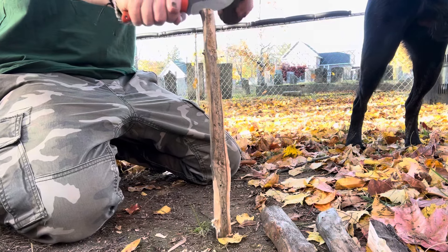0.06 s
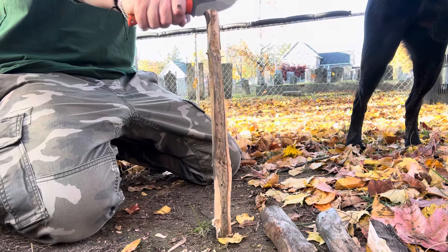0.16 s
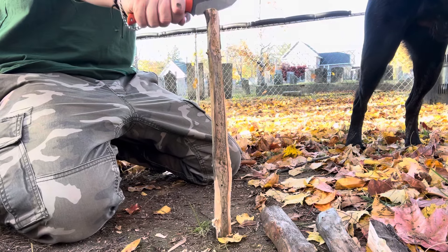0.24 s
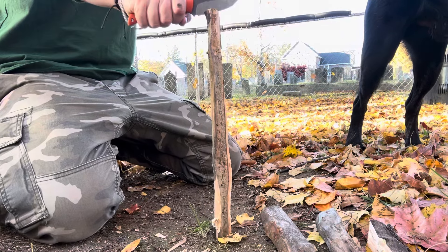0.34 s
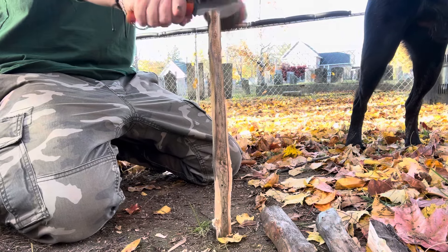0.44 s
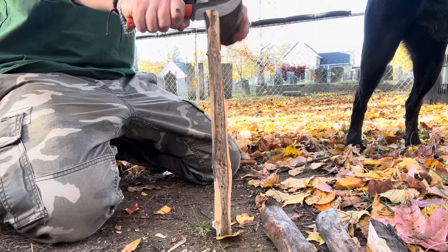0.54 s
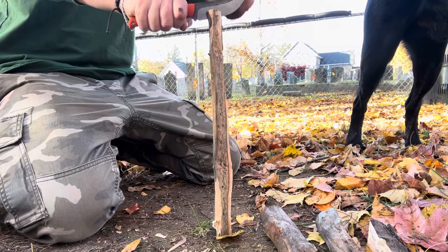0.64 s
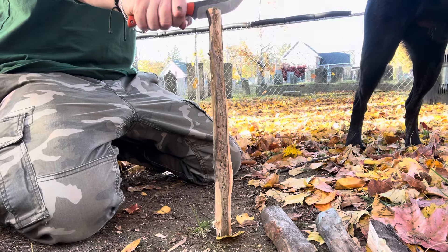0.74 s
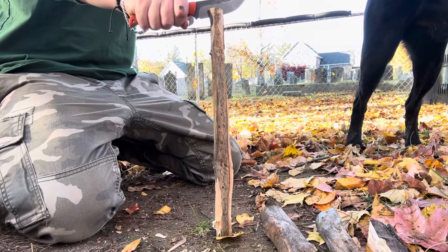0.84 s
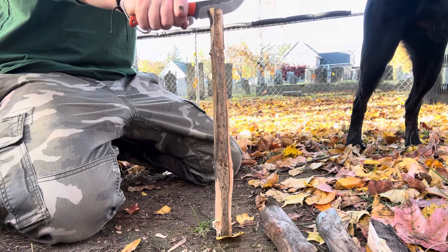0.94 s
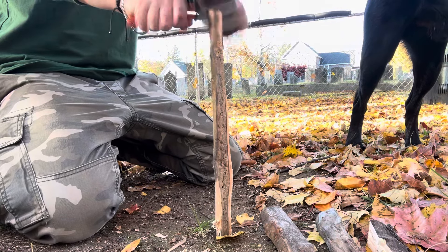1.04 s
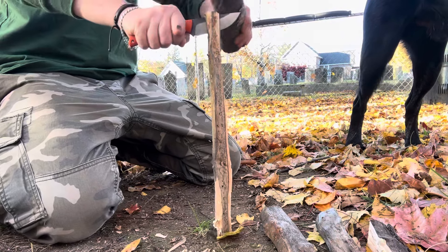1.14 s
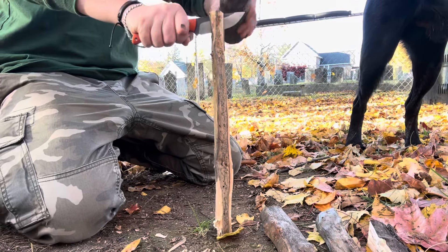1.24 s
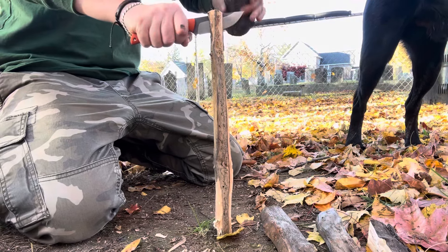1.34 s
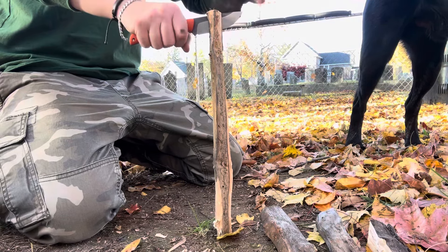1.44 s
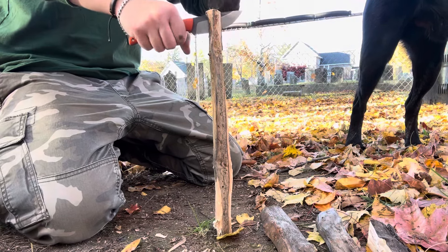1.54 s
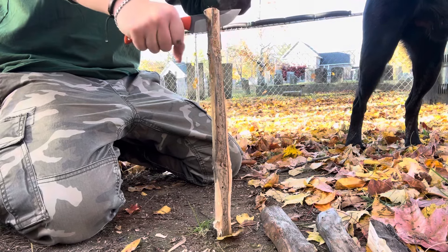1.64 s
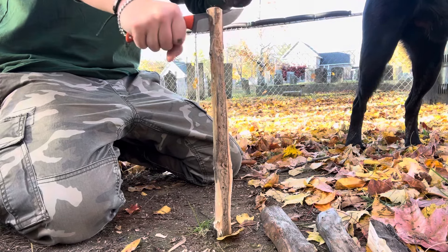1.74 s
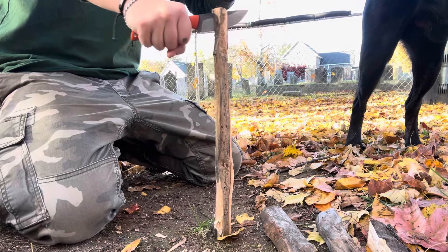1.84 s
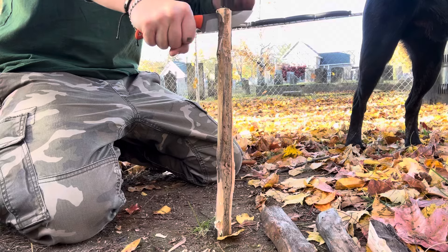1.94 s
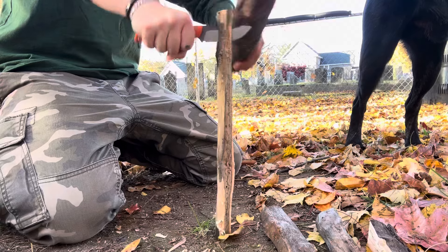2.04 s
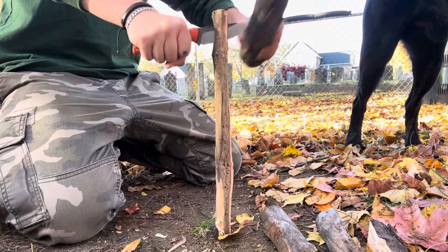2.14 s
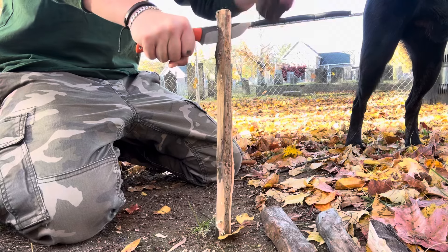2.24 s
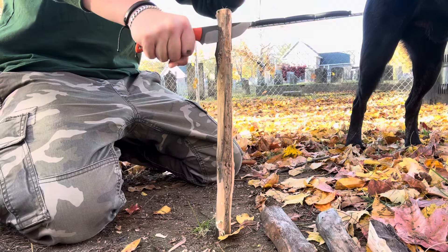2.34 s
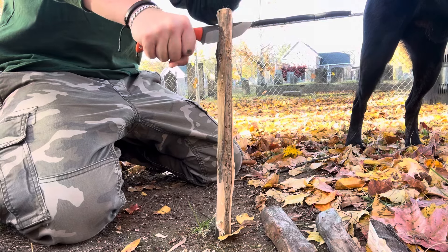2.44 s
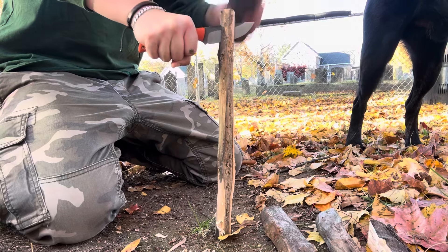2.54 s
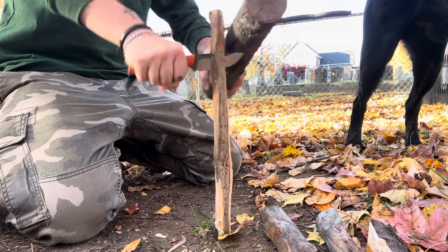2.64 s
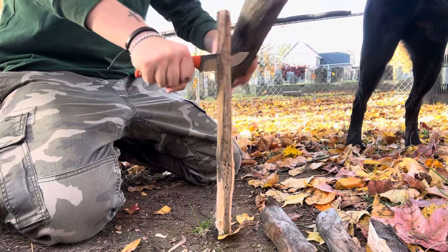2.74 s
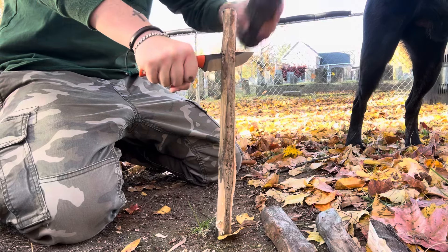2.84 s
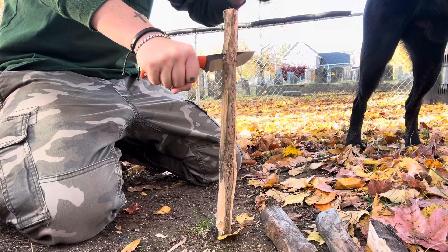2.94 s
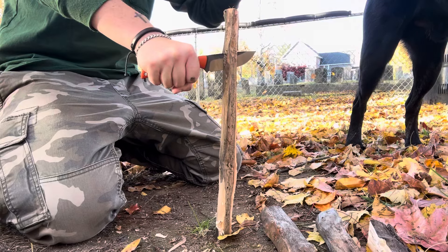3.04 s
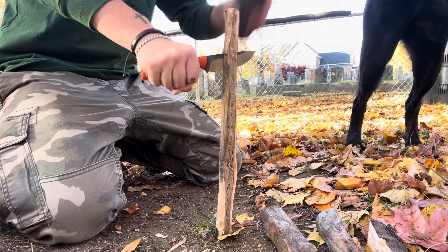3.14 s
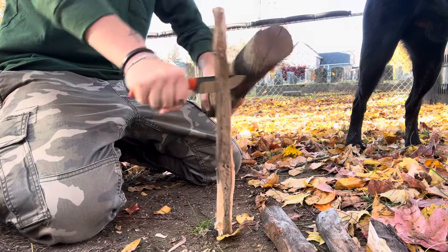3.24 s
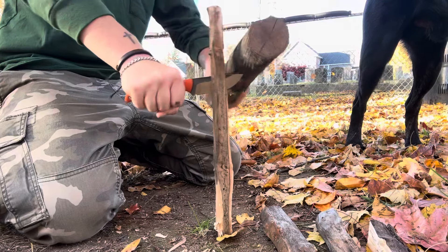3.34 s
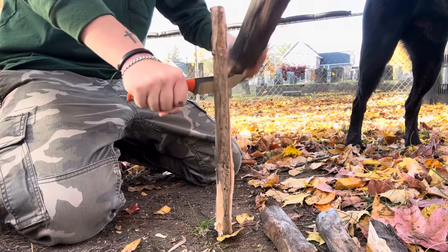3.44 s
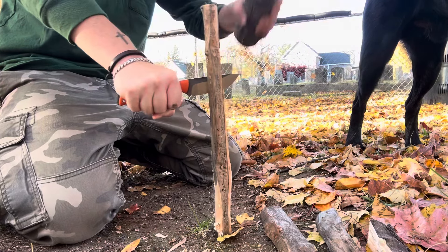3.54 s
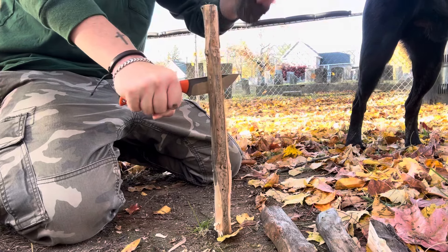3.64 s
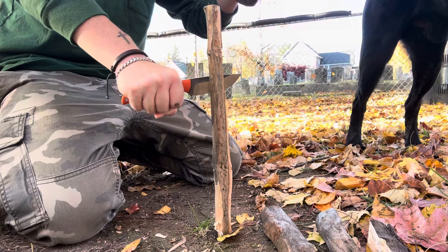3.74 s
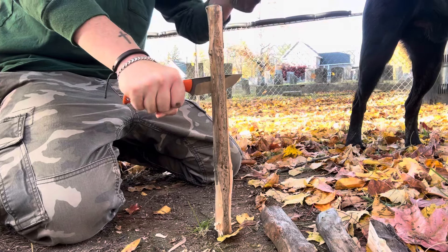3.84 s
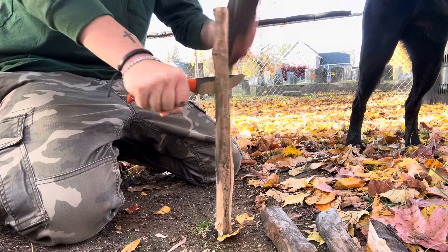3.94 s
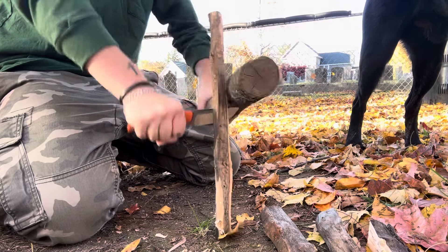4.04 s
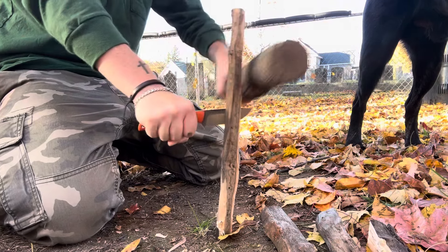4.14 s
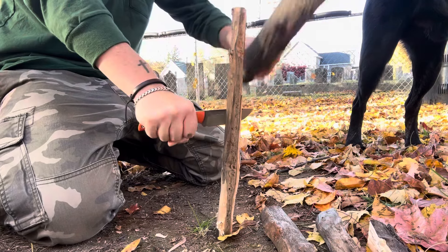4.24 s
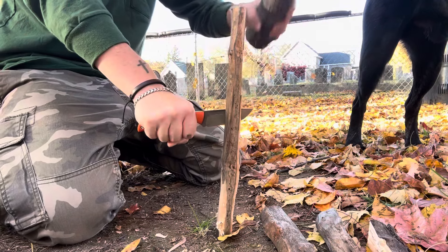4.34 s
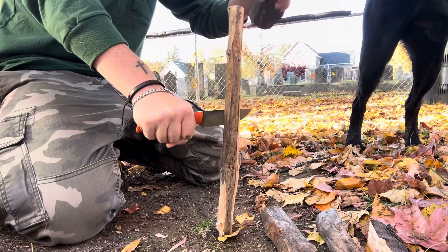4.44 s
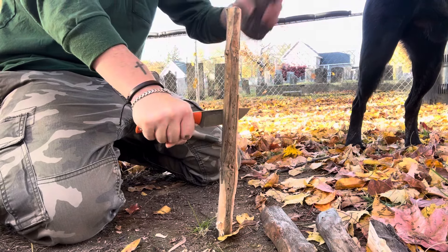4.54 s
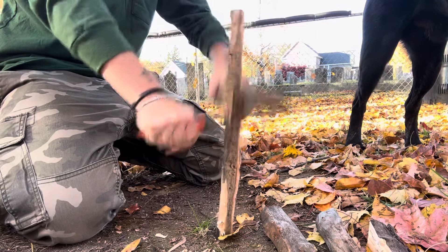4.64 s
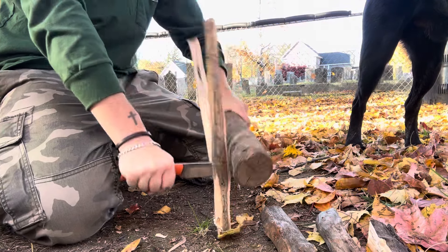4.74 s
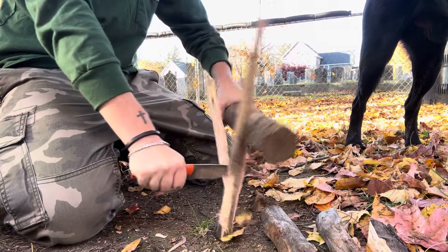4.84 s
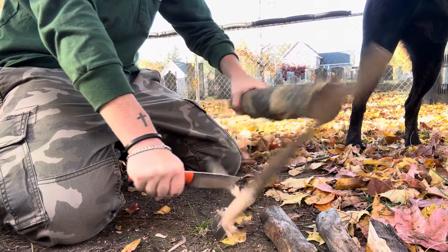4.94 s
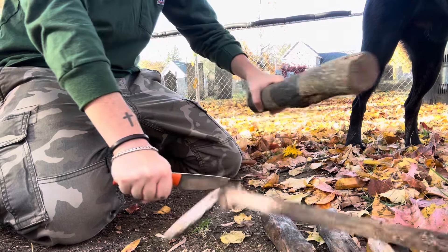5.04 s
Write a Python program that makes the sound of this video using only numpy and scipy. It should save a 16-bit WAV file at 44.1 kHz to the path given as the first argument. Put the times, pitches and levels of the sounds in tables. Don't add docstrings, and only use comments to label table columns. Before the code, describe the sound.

A short log knocks a knife down through a stick in seven sharp woody blows outdoors, until the wood splits and clatters onto soil.

```python
import sys
import numpy as np
from scipy import signal
from scipy.fft import rfft, irfft, next_fast_len
from scipy.io import wavfile
from scipy.ndimage import uniform_filter1d, map_coordinates

SR = 44100
rng = np.random.default_rng(int(sys.argv[2]) if len(sys.argv) > 2 else 0)


def attenuation_scalar(level_db):
    decades = np.asarray(level_db, float) / 20
    return 10 ** decades


def waveform_to_disk(signal):
    frames = np.transpose(np.atleast_2d(signal))
    scaled = np.clip(frames, -1, 1) * 32767
    samples = np.round(scaled).astype(np.int16)
    wavfile.write(sys.argv[1], SR, samples)


N = 224369


def along(points, hz):
    f, v = np.transpose(points)
    return np.interp(np.log(hz + 1), np.log(f + 1), v)


def unit(x):
    return x / np.sqrt(np.mean(x ** 2) + 1e-20)


def curves(rows):
    s, *cols = np.transpose(rows)
    return [np.interp(np.arange(N) / SR, s, c) for c in cols]


def add(track, s, sound):
    part = track[..., round(s * SR):][..., :sound.shape[-1]]
    part += sound[..., :part.shape[-1]]


def ring(hz, t60, rise_s):
    t = np.arange(SR // 5) / SR
    return np.sin(2 * np.pi * hz * t) * attenuation_scalar(-60 * t / t60) * (1 - np.exp(-t / rise_s))


def coloured(x, gain):
    n = x.shape[-1]
    return irfft(rfft(x) * gain(np.fft.rfftfreq(n, 1 / SR)), n)


def rush(spectrum, patchy_db):
    # frequency in Hz, likeness of left and right from -1 to 1.
    likeness = [(60, 0.98), (130, 0.81), (290, 0.16), (640, -0.059), (1400, -0.6), (3100, 0.02),
                (15000, 0.83)]
    z = signal.stft(rng.standard_normal((2, N + 1023)), nperseg=512)[2]
    field = uniform_filter1d(rng.standard_normal(z.shape[1:]), 6, 0)
    field = uniform_filter1d(field, 14, 1)
    pair = signal.istft(z * attenuation_scalar(patchy_db * unit(field)), nperseg=512)[1][:, :next_fast_len(N)]

    def gain(hz):
        turn = np.arccos(np.clip(along(likeness, hz), -1, 1)) / 2
        return attenuation_scalar(along(spectrum, hz)) * [np.cos(turn), np.sin(turn)]

    mid, side = coloured(pair, gain)[:, :N]
    return unit(np.array([mid + side, mid - side]))


def traffic():
    # time in seconds, rumble level in dB.
    passing = [(0, -37.5), (.4, -40), (1.0, -40), (1.7, -40), (2.3, -43.5), (2.9, -43.5), (3.3, -42.5),
               (3.7, -44.5), (4.0, -40), (4.3, -46), (5.09, -42.5)]
    # frequency in Hz, density in dB per Hz.
    rumble = [(13, -68), (22, -31.5), (43, -10), (86, -5), (134, -14), (156, -13), (266, -25.5),
              (300, -25.5), (390, -62.5), (660, -120)]
    road = [(110, -37), (180, -4.5), (267, -8), (333, -9.5), (450, -12), (500, -11.5), (1800, -19.5),
            (2340, -59), (3960, -120)]
    air = [(700, -41.5), (1200, -41), (1900, 6.5), (2500, 3), (4300, -2), (6250, -7.5), (10000, -12),
           (12000, -21.5), (12900, -59)]
    traffic_db, = curves(passing)
    swing_db = traffic_db - traffic_db.mean()
    out = attenuation_scalar(traffic_db) * rush(rumble, patchy_db=1.0)
    out += attenuation_scalar(-54.0 + 0.94 * swing_db) * rush(road, patchy_db=0.44)
    out += attenuation_scalar(-61.5 + 0.25 * swing_db) * rush(air, patchy_db=1.7)
    return out


def far_engine():
    # time in seconds, level in dB.
    hum = [(0, -41), (.1, -47.5), (.2, -43), (.45, -40), (.6, -46), (.76, -36.5), (.84, -48.5), (1.2, -46),
           (1.31, -42), (1.64, -38), (2.03, -41), (2.15, -52.5), (2.55, -46), (2.65, -56.5)]
    t = np.arange(N) / SR
    wander_hz = 1.0 * map_coordinates(rng.standard_normal(48), [8 * t])
    phase = 2 * np.pi * np.cumsum(124.0 + wander_hz) / SR
    return np.sqrt(2) * attenuation_scalar(curves(hum)[0]) * np.sin(phase)


def rustle():
    # peak in seconds, level in dB, swell in dB/s, fade in dB/s.
    strokes = [
        (.03, -65, 300, 700),
        (1.426, -56.5, 400, 321.5),
        (1.64, -67, 94, 150),
        (1.91, -68, 250, 256.5),
        (4.816, -56.5, 600, 164),
    ]
    t = np.arange(N) / SR
    strength = sum(attenuation_scalar(db - np.maximum(swell * (s - t), fade * (t - s))) for s, db, swell, fade in strokes)
    brush = [(3000, -31.5), (6000, -9), (9500, -6.5), (11500, -10), (13000, -49)]  # Hz, dB per Hz
    return strength * rush(brush, patchy_db=4.0)


def snaps(rows, grain_db, apart):
    # frequency in Hz, level in dB.
    splinter = [(150, -24.5), (400, -5.5), (650, -19), (1000, -8.5), (2500, -6.5), (5000, 4.5),
                (9500, -3.5), (12000, -2.5), (13500, -5.5), (15400, -13.5), (16300, -50)]
    # frequency in Hz, width in Hz, height in dB.
    cleft = [(1150, 400, -2.5), (1870, 100, 12.5), (3700, 500, 1), (5800, 750, 4), (9250, 340, 4.5),
             (10000, 1330, 2)]
    out, t = np.zeros((2, N)), np.arange(8192) / SR
    for s, db, t60, tilt_db in rows:
        common, *own = rng.standard_normal((3, len(t)))
        clumps = unit(uniform_filter1d(rng.standard_normal(len(t)), size=24))
        clicks = (common + apart * np.array(own)) * attenuation_scalar(grain_db * clumps)
        shift = attenuation_scalar(.4 * rng.standard_normal(len(cleft)))

        def tone(hz):
            peaks = sum(d / (1 + ((hz - c * k) / w) ** 2) for (c, w, d), k in zip(cleft, shift))
            return attenuation_scalar(along(splinter, hz) + peaks + tilt_db * np.log2((hz + 99) / 8000))

        envelope = attenuation_scalar(-60 * t / t60) * (1 - np.exp(-t / 0.00028))
        add(out, s, attenuation_scalar(db - 1.5) * unit(coloured(clicks, tone)) * envelope)
    return out


def leaf_ticks():
    # start in seconds, level in dB.
    ticks = [(.362, -62), (.752, -53.5), (1.293, -51), (1.306, -45), (1.3242, -42.5), (1.328, -43.5),
             (1.528, -58.5), (1.573, -54), (2.18, -47.5), (2.2194, -56), (2.853, -45.5), (2.8958, -47),
             (3, -53.5), (3.122, -52), (3.141, -47), (3.163, -44), (3.29, -40), (3.422, -53),
             (3.437, -48.5), (3.452, -49), (3.472, -50), (3.512, -54.5), (3.546, -50.5), (3.579, -52),
             (4.333, -57)]
    return snaps([(s, db, .012, 6.5) for s, db in ticks], grain_db=3.0, apart=1.0)


def tears():
    # start in seconds, level in dB, gap in seconds, loss in dB a snap, tilt in dB per octave.
    runs = [
        (0.4667, -12, .004, 9, 1.5),
        (1.068, -11.5, 0.0029, 9, 4.5),
        (2.037, -5.5, 0.0038, 8.5, -1.1),
        (2.603, -6, .006, 9, -1.5),
        (3.2117, -2.5, .0042, 6, 0.3),
        (3.9899, -3.5, 0.0071, 6, 1),
        (4.6505, -6, .012, 7, 1.5),
    ]
    rows = [(s + k * gap, db - k * loss_db, 0.015 * 1.3 ** k, tilt_db - k * 2.53)
            for s, db, gap, loss_db, tilt_db in runs for k in range(4)]
    return snaps(rows, grain_db=4, apart=.3)


def knock(log_hz, blade_hz, blade_db, t60):
    blade = ring(blade_hz, t60, 0.0001) + 0.28 * ring(1.3 * blade_hz, 0.61 * t60, 0.000067)
    log = ring(log_hz, t60, 0.00041)
    log += 0.5 * ring(1.25 * log_hz, 0.88 * t60, 0.00038)
    log += 1.1 * ring(1.6 * log_hz, 0.68 * t60, .0003)
    return attenuation_scalar(7.5) * (log + attenuation_scalar(blade_db) * blade)


def blows():
    # start in seconds, level in dB, log mode in Hz, blade in dB against log, t60 in seconds.
    strikes = [
        (0.467, -13, 1497, 8.5, 0.0076),
        (1.0681, -11.5, 1068, 3, 0.012),
        (2.0371, -11.5, 1150, -4, 0.015),
        (2.598, -13, 1105, -10.5, 0.016),
        (3.2114, -15, 1265, -7, 0.0099),
        (3.9889, -16.5, 1344, -8.5, .017),
        (4.648, -16, 1088, -13, .009),
    ]
    out = np.zeros(N)
    for s, db, log_hz, blade_db, t60 in strikes:
        add(out, s, attenuation_scalar(db) * knock(log_hz, 2340, blade_db, t60))
    return out


def rings():
    # start in seconds, level in dB, frequency in Hz, t60 in seconds.
    modes = [(.4675, -14.5, 810, .012), (2.0373, -12, 1508, .012), (3.2121, -12, 3004, .014),
             (1.0691, -5, 3070, 0.011), (1.0741, -16.5, 759, .012), (4.757, -42, 4730, .03),
             (1.073, -20, 997, 0.058), (1.073, -19.5, 1109, 0.058), (2.6016, -7, 3700, 0.0097),
             (3.213, -8, 3990, 0.013), (3.99, -17, 2840, .014), (4.6535, -7.5, 5600, 0.028),
             (4.816, -42, 1680, 0.058), (4.975, -32.5, 804, 0.11), (4.975, -45.5, 1097, .16),
             (5.074, -32, 600, .087), (5.074, -31, 1445, .07), (5.034, -23, 1565, 0.17)]
    out = np.zeros(N)
    for s, db, hz, t60 in modes:
        add(out, s, attenuation_scalar(db) * ring(hz, t60, 0.00099))
    return out


def pushes(rows):
    out = np.zeros(N)
    for s, db, hz, t60 in rows:
        add(out, s, attenuation_scalar(db + 3.5) * ring(hz, t60, 0.00081))
    return out


def thumps():
    # start in seconds, deep level in dB, deep frequency in Hz (minus for a rarefaction first),
    # deep delay in seconds, quick level in dB against deep.
    drives = [
        (.4703, -11, 93, .012, -12),
        (1.0754, -11, -105, 0.0067, -9.5),
        (2.045, -17.5, -125, .0091, -18),
        (2.599, -22, 95, .012, -8.5),
        (3.213, -25, 82, .012, 0),
        (3.992, -24.5, 132, 0.0107, -1.5),
        (4.651, -21.5, 123, 0.0083, -3),
        (5.031, -40, 111, 0.0041, 0),
    ]
    # frequency in Hz, level in dB, t60 in seconds, share of the deep delay.
    quick_modes = [(367, -0.5, 0.045, 0), (228.9, -2.2, 0.07, .45)]
    deep = [(s + lag, db, hz, .062) for s, db, hz, lag, _ in drives]
    quick = [(s + share * lag, db + over_db + level, hz, t60)
             for s, db, _, lag, over_db in drives for hz, level, t60, share in quick_modes]
    return pushes(deep + quick)


def jolts():
    # start in seconds, level in dB, frequency in Hz (minus for a rarefaction first), t60 in seconds.
    shoves = [
        (0.4707, -3, -190, 0.0088),
        (0.515, -15, -100, 0.029),
        (2.0516, -13.5, 233, 0.019),
        (3.239, -19.5, -87.5, 0.04),
        (4.635, -27, 426, 0.031),
        (4.652, -22, 519.5, 0.023),
        (4.9709, -12.5, -570, 0.01),
        (4.972, -36, 212, .08),
    ]
    return pushes(shoves)


def fibres():
    # start in seconds, level in dB, t60 in seconds, tilt in dB per octave.
    breaks = [(.512, -37, 0.03, -2.5), (2.094, -43, 0.035, 0), (2.64, -37, 0.11, -4),
              (3.208, -13, 0.0074, -4), (3.2336, -22.5, 0.021, -4.5), (2.5976, -3.5, .011, 7),
              (3.27, -33.5, 0.031, -3.2), (3.2725, -21, 0.013, -6), (3.982, -21.5, .04, -2.5),
              (3.9859, -14, 0.014, -7), (4.6331, -14.5, 0.18, -3.1), (4.6457, -13.5, .03, -2.5),
              (4.638, -21, .03, 10), (4.655, -18, 0.026, -8), (4.703, -36, 0.16, -11.5),
              (4.756, -37, 0.066, 1.5), (4.781, -38, 0.03, 0.5), (4.797, -23, 0.019, -2),
              (4.9706, -25.5, 0.041, -5), (5.013, -35, 0.3, -6.5), (5.021, -30, 0.035, -9.5),
              (5.03, -20, 0.031, -5.8), (5.071, -20.5, 0.017, -5), (5.0755, -28, 0.044, -7)]
    return snaps(breaks, grain_db=4, apart=.3)


def crumbs():
    # start in seconds, level in dB.
    trickles = [
        (1.075, -49.5),
        (2.045, -43),
        (2.61, -40.5),
        (3.22, -39.5),
        (4.0, -38),
        (4.662, -36.5),
    ]
    return snaps([(s, db, 0.39, -2.8) for s, db in trickles], grain_db=3.0, apart=0.89)


def taps():
    # start in seconds, level in dB, frequency in Hz, t60 in seconds.
    touches = [
        (3.212, -19, 1720, 0.022),
        (2.048, -37.5, 1293, 0.04),
        (2.6026, -14.5, 1500, 0.0082),
        (2.65, -44, 1880, 0.031),
        (3.2176, -30.5, 1600, 0.006),
        (3.2725, -36, 1800, 0.0085),
        (3.981, -26, 1000, 0.0096),
        (4.9713, -37.5, 1987, 0.037),
        (5.0147, -31, 840, 0.016),
    ]
    out = np.zeros(N)
    for s, db, hz, t60 in touches:
        add(out, s, attenuation_scalar(db) * knock(hz, 2 * hz, -4, t60))
    return out


def fall():
    # landing in seconds, level in dB.
    bounces = [
        (5.0305, -13),
        (5.0327, -18.5),
        (5.0346, -20),
        (5.0716, -21),
        (5.076, -30),
    ]
    # frequency in Hz, level in dB, t60 in seconds.
    stick = [(610, -10.5, 0.16), (676, -8, 0.3), (970, -18, 0.061), (1595, -10, 0.26), (1776, -7.5, 0.096),
             (2078, -23, 0.037), (2600, -9.5, 0.025), (3142, -2.5, 0.0304), (4170, -7, 0.028)]
    out = np.zeros(N)
    for s, db in bounces:
        for hz, level, t60 in stick:
            add(out, s, attenuation_scalar(db + level + rng.normal(0, 1.2)) * ring(hz, t60, 0.00124))
    return out


def ground(x, share, delay_s):
    return coloured(x, lambda hz: 1 + share * np.exp(-2j * np.pi * hz * delay_s) / (1 + (hz / 3000) ** 2))


def yard(x, delay_s):
    # frequency in Hz, t60 in seconds.
    decay = [(150, .2), (800, 0.11), (1800, .36), (2500, 0.61), (3200, 0.37), (5000, 0.16), (10000, .18)]
    # frequency in Hz, level in dB.
    walls = [(300, -30), (1000, -35), (2400, -39), (4000, -30), (6000, -30), (10000, -26), (12500, -29),
             (14000, -50)]
    out, step = np.zeros((2, N)), SR // 5
    for at in range(0, N, step):
        hz, t, z = signal.stft(rng.standard_normal((2, SR // 2)), SR, nperseg=256)
        swell = 0.25 + np.clip(t / delay_s, 0, 1) ** 4
        z = z * swell * attenuation_scalar(-60 * t / along(decay, hz)[:, None])
        tail = signal.istft(z, SR, nperseg=256)[1]
        add(out, at / SR, signal.fftconvolve(x[None, at:at + step], tail / np.linalg.norm(tail[0]), axes=1))
    left, right = out
    echo = np.array([left + 0.24 * right, right + 0.33 * left])
    return coloured(echo, lambda hz: attenuation_scalar(along(walls, hz)))


def ports(pair):
    # frequency in Hz, phase of left against right in radians.
    lead = [(60, 0), (200, 0.16), (430, 1), (690, -0.53), (1400, -0.9), (2330, -1.4), (3400, -2),
            (5700, -3), (6700, -2), (8200, -1.1), (11100, 0.94), (13300, 2.5), (16400, 4.5)]
    turned = coloured(pair, lambda hz: np.exp(.5j * along(lead, hz) * [[1], [-1]]))
    return turned * attenuation_scalar([[-.8], [.8]])


def smear(x):
    # attack in seconds, length in seconds, left level in dB, right level in dB.
    hazes = [
        (0.4668, 0.015, -5, -12),
        (1.07, .022, 0, -11.5),
        (2.033, 0.011, -29, -20),
        (2.5969, 0.015, -12.5, -16.5),
        (3.208, .012, -20, -28),
        (3.98, 0.013, -11.5, -16),
        (4.6306, .014, -20.5, -28),
        (5.038, 0.018, -2, 1.5),
    ]
    out = x.copy()
    for s, length, left_db, right_db in hazes:
        swell = np.sin(np.linspace(0, np.pi / 2, round(length * SR))) ** 3
        attack = coloured(x[:, round(s * SR):][:, :256], lambda hz: (hz > 600) * (hz < 6800))
        haze = signal.fftconvolve(attack, rng.standard_normal((2, 2048)), "valid", axes=1)[:, :len(swell)]
        add(out, s - length, attenuation_scalar([[left_db], [right_db]]) * haze * swell / 16)
    return out


def treble_gate(x, edge_hz, open_db):
    hz, _, z = signal.stft(x, SR, nperseg=512)
    top = hz > edge_hz
    loud = np.sqrt(np.mean(np.abs(z[:, top]) ** 2, axis=(0, 1))) > attenuation_scalar(open_db)
    z[:, top] *= loud
    return signal.istft(z, SR, nperseg=512)[1][:, :N]


def scene():
    around = traffic() + far_engine() + rustle() + leaf_ticks()
    wood = tears() + blows() + rings() + fibres() + taps()
    struck = ground(wood, share=.6, delay_s=.00078)
    near = struck + fall() * attenuation_scalar([[-1.5], [1.5]])
    echo = yard(near[0], delay_s=.045)
    return ports(near + thumps() + jolts() + echo + crumbs()) + around


def roll_off(x):
    return signal.sosfilt(signal.butter(12, 16820, fs=SR, output="sos"), x)


def record(dry):
    x = signal.sosfilt(signal.butter(2, 48, "high", fs=SR, output="sos"), dry)
    x = x / (1 + np.abs(x / .98) ** 6) ** (1 / 6)
    x = treble_gate(smear(x), edge_hz=12900, open_db=-89)
    return roll_off(x)


dry = scene()
out = record(dry)
waveform_to_disk(out)
```